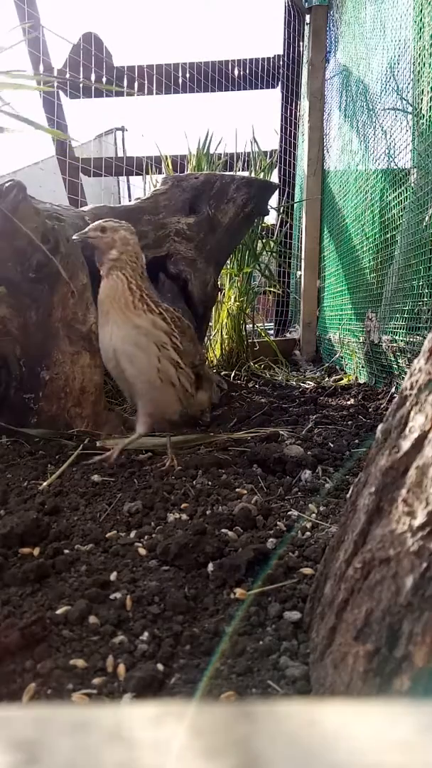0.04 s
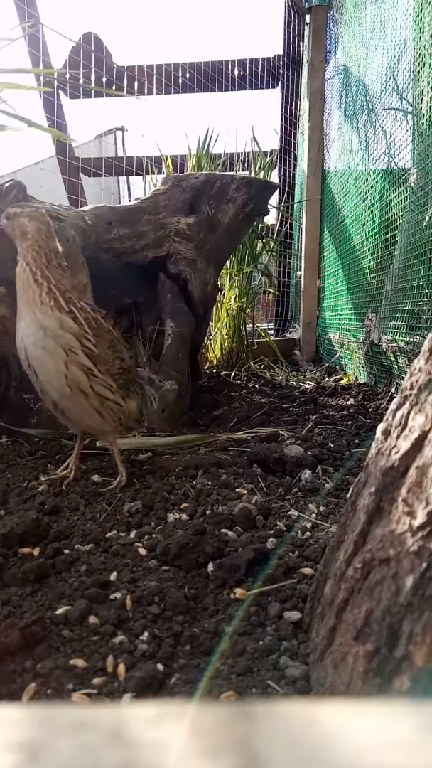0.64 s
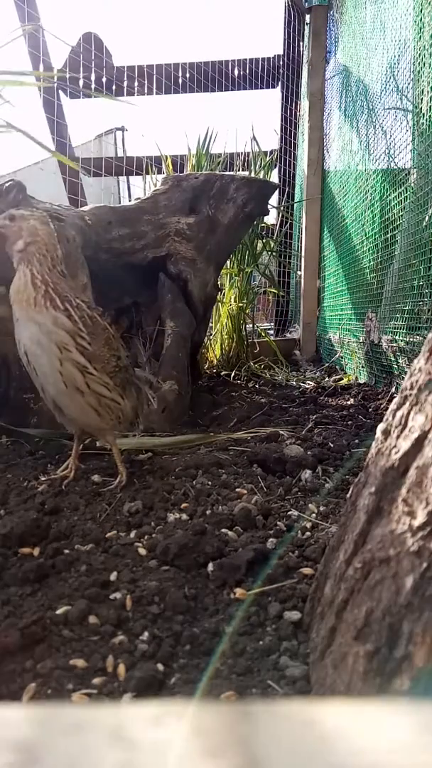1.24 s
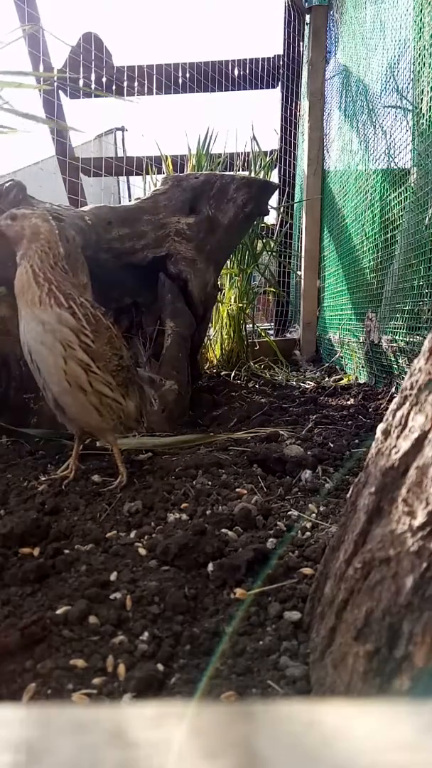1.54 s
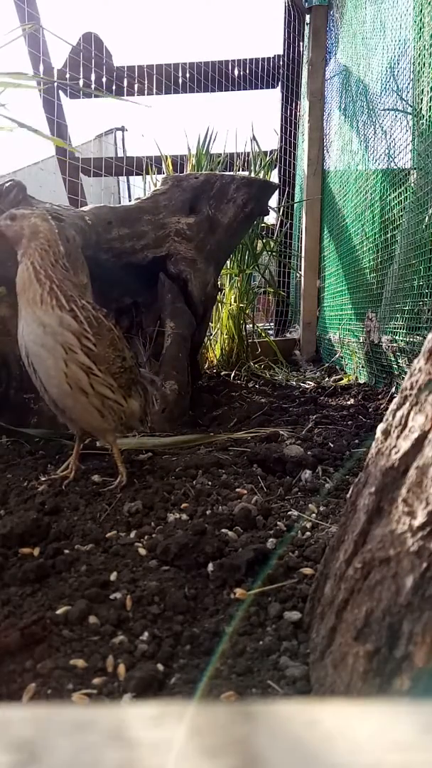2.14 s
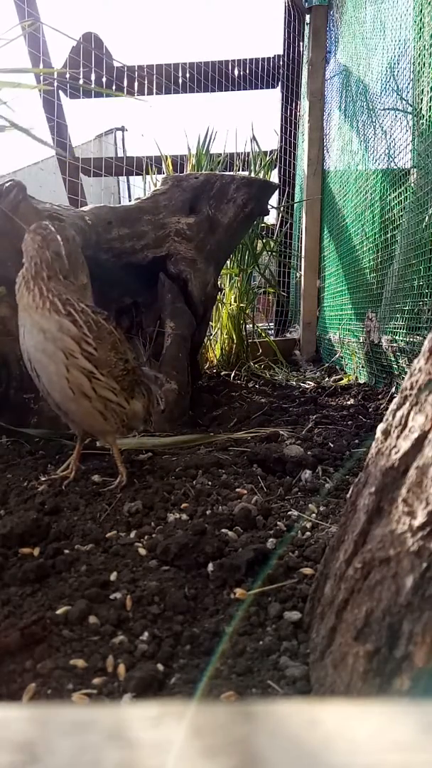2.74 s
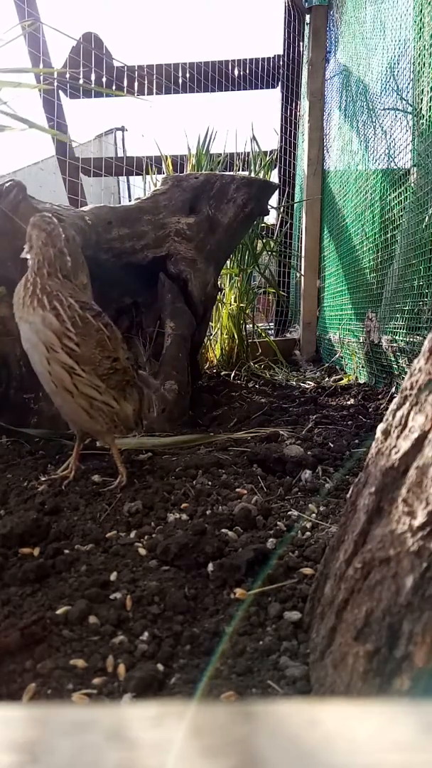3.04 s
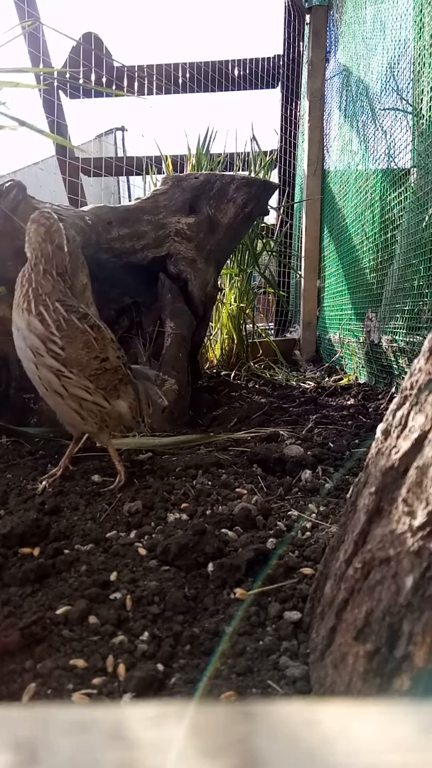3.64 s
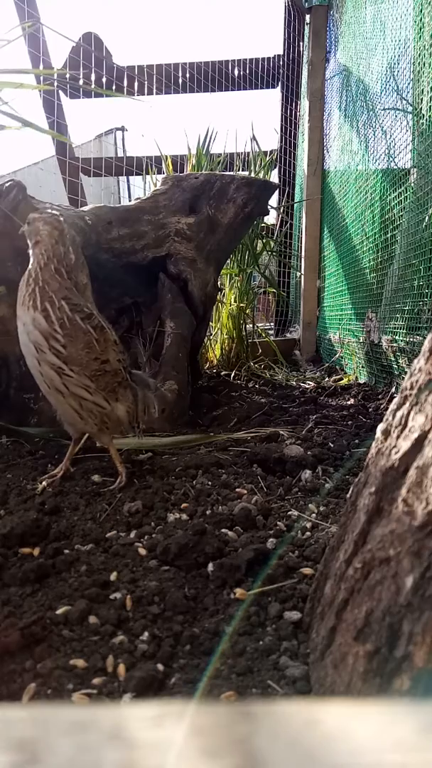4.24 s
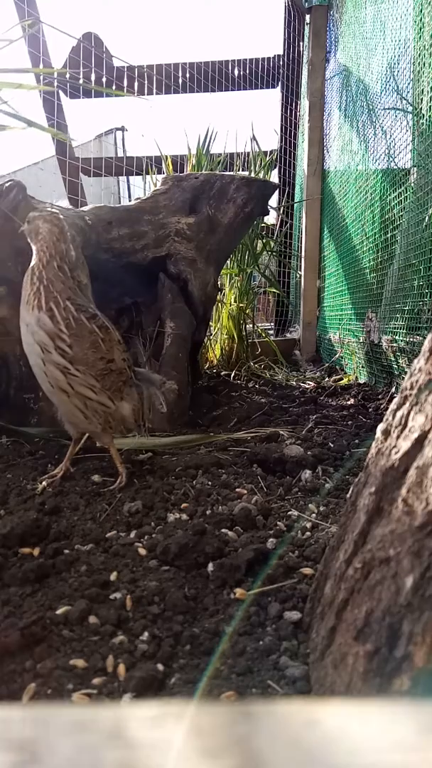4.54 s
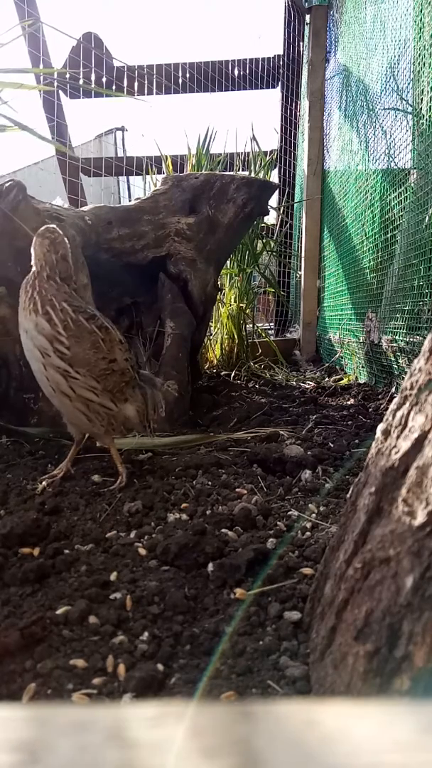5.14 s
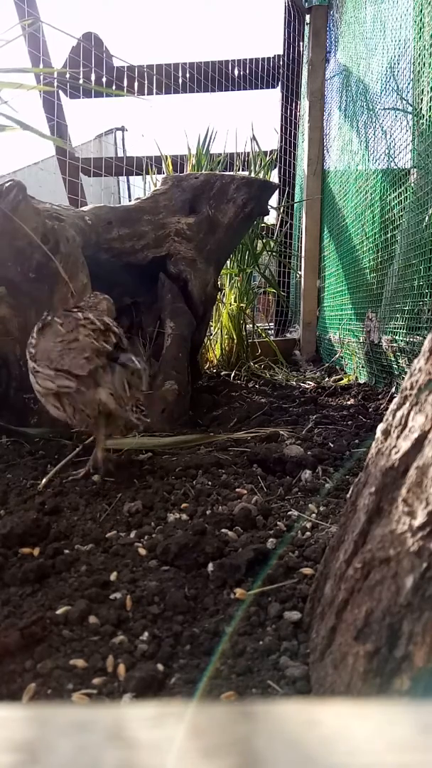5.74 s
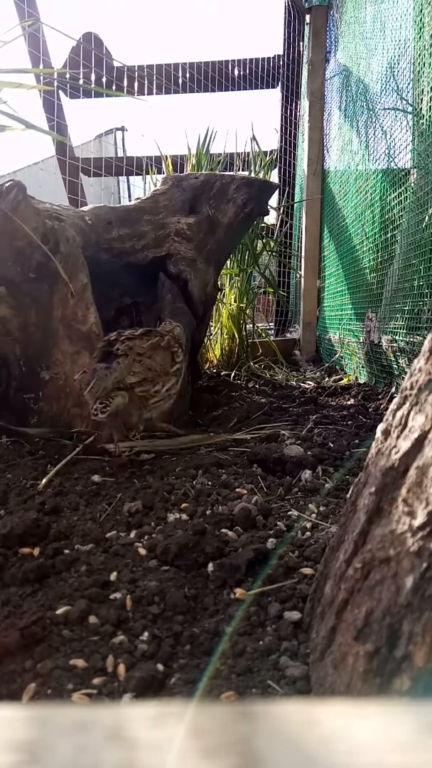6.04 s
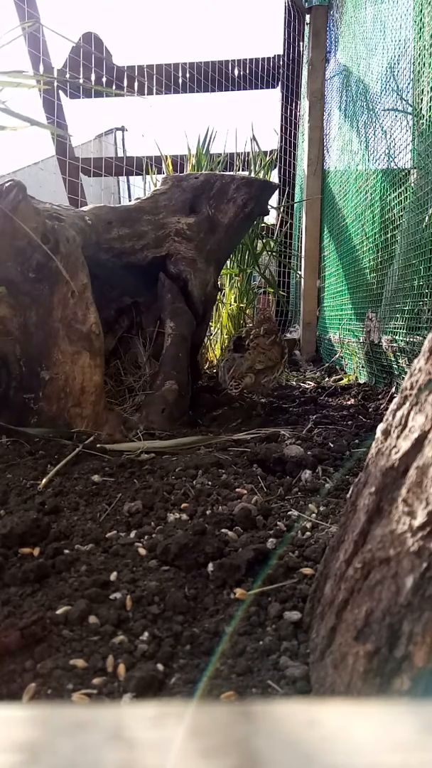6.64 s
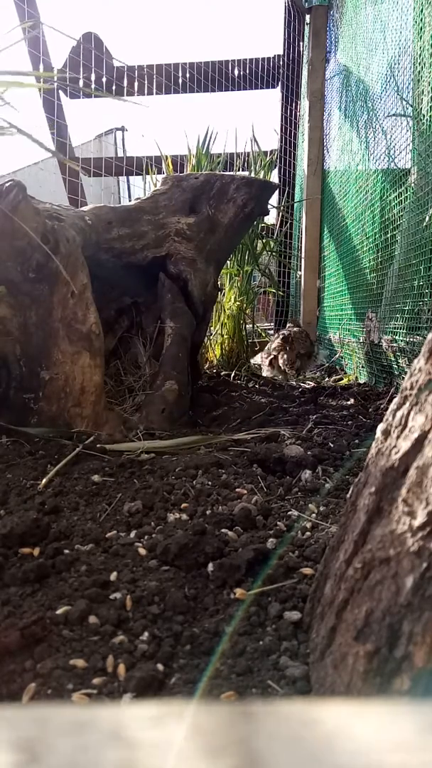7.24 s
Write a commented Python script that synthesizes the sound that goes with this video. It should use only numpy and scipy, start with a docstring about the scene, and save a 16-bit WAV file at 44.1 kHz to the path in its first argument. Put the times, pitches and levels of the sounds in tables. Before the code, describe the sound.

In an outdoor pen with a slight echo, a nearby quail crows three times, each a hoarse, brief wa-wa, and follows with a single hard chip. After that only faint distant bird calls and a couple of thin whistles are heard over a soft hush. Dry straw and soil rustle lightly now and then, while an uneven breeze buffets the microphone, mostly on the right.

```python
"""Quail crowing in a pen

A close quail gives three rasping crows and one sharp chip. In each crow, pulses from its voice box
ring in its throat and beak, and the outdoor pen adds a short echo. Small birds whistle nearby, others
call far off, and something rustles in the dry litter. A breeze buffets the right microphone over a
faint outdoor hush."""
import sys
import numpy as np
from scipy import signal
from scipy.fft import rfft, irfft, next_fast_len
from scipy.io import wavfile
from scipy.ndimage import uniform_filter1d

SR = 44100
rng = np.random.default_rng(int(sys.argv[2]) if len(sys.argv) > 2 else 0)


def store_pcm(level_fs):
    """Save levels as 16-bit WAV."""
    pcm = np.round(np.clip(level_fs, -1, 1) * 32767).astype(np.int16)
    wavfile.write(sys.argv[1], SR, np.atleast_2d(pcm).T)


N = 321923
TIME = np.arange(N) / SR


def from_db(db):
    return 10 ** (np.asarray(db) / 20)


def rms_one(x):
    """Scale a signal to an average power of 1."""
    return x / np.sqrt(np.mean(x ** 2) + 1e-20)


def in_time(rows):
    """Join rows of (time_s, values...) with straight lines: one curve per value."""
    times, *columns = np.transpose(rows)
    return [np.interp(TIME, times, column) for column in columns]


def hump(t, at, width, order=2):
    """A bell shape of height 1; a higher order flattens its top."""
    return np.exp(-np.minimum(np.abs((t - at) / width) ** order, 60))


def drift(rate_hz):
    """A smooth random wander, about 1 in size."""
    pole = np.exp(-40 * np.pi * rate_hz / SR)
    steps = rng.standard_normal(N // 20 + 2002)   # one per 20 samples
    slow = signal.lfilter([1], [1, -2 * pole, pole * pole], steps)[2000:]
    return np.interp(np.arange(N) / 20, np.arange(len(slow)), rms_one(slow))


def band(x, low_hz, high_hz):
    """Keep the sound between two frequencies."""
    edges = [low_hz, min(high_hz, SR / 2 - 500)]
    return signal.sosfilt(signal.butter(2, edges, "band", fs=SR, output="sos"), x + 1e-18)


def place(x, pan_db, lag_ms):
    """Make stereo: the left side is pan_db louder and lag_ms later than the right."""
    left = np.interp(TIME - lag_ms / 1000, TIME, x)
    return np.array([left * from_db(pan_db / 2), x * from_db(-pan_db / 2)])


def noise(colour, pan_db):
    """Separate left and right noise, shaped by rows of (frequency_hz, level_db)."""
    hz, db = np.transpose(colour)
    size = next_fast_len(N)
    bin_hz = np.arange(size // 2 + 1) * SR / size
    gain = from_db(np.interp(np.log(bin_hz + 1), np.log(hz), db, left=-90, right=-90))
    shaped = irfft(rfft(rng.standard_normal((2, size))) * gain, size)[:, :N]
    return rms_one(shaped) * from_db([[pan_db / 2], [-pan_db / 2]])


def note(rows, harmonics, waver, waver_hz):
    """A gliding tone with overtones; its pitch wanders by the fraction `waver`."""
    hz, db = in_time(rows)
    sounding = (TIME > rows[0][0]) & (TIME < rows[-1][0])
    level = uniform_filter1d(1. * sounding, size=130) * from_db(db)
    on, out = level > 1e-7, np.zeros(N)
    pitch_hz = hz * (1 + waver * drift(waver_hz))
    phase = 2 * np.pi * np.cumsum(pitch_hz[on]) / SR
    tone = sum(from_db(gain_db) * np.sin(round(k) * phase) for k, gain_db in harmonics)
    out[on] = level[on] * np.sqrt(2) * tone
    return out


def pen_echo(x, fade_s, dull_hz=4950):
    """Dense, dull reflections from logs, fence and walls, falling 60 dB in fade_s."""
    t = TIME[:SR]
    tail = rng.standard_normal((2, SR)) * from_db(-60 * t / fade_s) * (1 - np.exp(-t / 0.0031))
    tail = band(tail, 250, dull_hz)
    tail /= np.sqrt(np.sum(tail ** 2) / 2 * SR / 2 / dull_hz)
    return signal.fftconvolve(x[None], tail, axes=1)[:, :N]


def hush():
    """Faint outdoor noise, stronger on the left; its upper part swells slowly and drops away."""
    # loudness of each part over time: time_s, level_db
    low_levels = [(0, -60), (1, -63), (2.95, -64), (3.5, -61), (4.62, -57.5), (4.76, -63), (5.25, -60.5),
                  (5.4, -55), (6.2, -58.5), (7.3, -62)]
    upper_levels = [(0, -71), (.7, -62.5), (1, -68), (2.95, -69.5), (3.5, -63), (4.66, -55), (4.73, -67.5),
                    (7.3, -63)]
    # tone colour of each part: frequency_hz, level_db
    low_colour = [(200, -7.5), (330, 2), (520, 1), (750, -2.5), (1000, 0.5), (1300, -16.5), (2000, -29)]
    upper_colour = [(800, -18.5), (1150, 1), (1650, -4.5), (2100, -16.5), (3000, -23.5), (4500, -16),
                    (8000, -48)]
    low_db, = in_time(low_levels)
    upper_db, = in_time(upper_levels)
    low = from_db(low_db + 4.5 + 1.3 * drift(8.6)) * noise(low_colour, pan_db=8.5)
    return low + from_db(upper_db) * noise(upper_colour, pan_db=12)


def rustle_level(rise_s=0.016, fall_s=0.044, floor_db=-73.5):
    """Loudness in dB: each bout of rustling comes up quickly, holds and dies away."""
    # bouts of rustling: start_s, length_s, level_db
    bouts = [(.01, .44, -61.5), (.59, .2, -65), (2.04, 0.3, -62), (2.43, 0.21, -59.5), (3.42, 0.22, -60.5),
             (3.74, .12, -58), (3.87, .07, -63.5), (4.53, .08, -67.5), (4.675, 0.055, -65.5),
             (4.85, 0.32, -61.5), (5.31, 0.14, -59), (5.59, 0.098, -68.5), (5.94, 0.016, -69),
             (6.11, 0.088, -68.5), (7.11, 0.047, -70.5)]
    power = from_db(floor_db) ** 2
    for start, length, db in bouts:
        fade = np.maximum(start - TIME, 0) / rise_s + np.maximum(TIME - start - length, 0) / fall_s
        power = power + from_db(db) ** 2 * np.exp(-2 * np.minimum(fade, 20))
    return 10 * np.log10(power)


def straw_grain(flutter_db=1.5, ticks_per_s=38, decay_s=0.0069):
    """The uneven grain of a rustle: a fine flutter, and ticks as single straws snap."""
    snaps = (rng.random(N) < ticks_per_s / SR) * np.minimum(rng.exponential(1, N), 3)
    ticks = signal.lfilter([1], [1, -np.exp(-1 / (decay_s * SR))], snaps + 1e-18)
    return rms_one(from_db(flutter_db * drift(90)) + 0.87 * ticks)


def rustle():
    """Dry litter rustles; a fine hiss and a low rumble swell with it."""
    # tone colour of each layer: frequency_hz, level_db
    straw_colour = [(1200, -7), (2500, -5), (4500, -5), (6600, 1.5), (7500, -6.5), (8600, -18.5),
                    (12000, -32)]
    hiss_colour = [(6000, -24), (8500, -13.5), (11500, -11.5), (13500, -13), (15000, 4.5), (17000, -1)]
    rumble_colour = [(20, -19.5), (55, -2), (110, 3), (170, -4.5), (270, -9.5), (450, -24), (800, -37.5)]
    level_db, grain = rustle_level(), straw_grain()
    straw = from_db(level_db + 5.5) * grain * noise(straw_colour, pan_db=0.5)
    hiss = from_db(0.81 * level_db - 10.5) * grain * noise(hiss_colour, pan_db=0.5)
    rumble = from_db(-45 + 0.45 * (level_db - level_db.mean())) * noise(rumble_colour, pan_db=1.5)
    return straw + hiss + rumble


def crackles(decay_s=0.025, gain_db=-8):
    """Dry straw and soil crunch in short grainy bursts."""
    # crunches: start_s, level_db
    bursts = [(0.7417, -37.5), (2.444, -38.5), (2.5546, -41), (2.614, -57), (2.672, -45.5), (3.747, -40),
              (4.134, -43), (4.174, -38), (4.8668, -45.5), (6.1883, -46.5)]
    level = np.zeros(N)
    for start, db in bursts:
        first = int(start * SR)
        level[first:] += from_db(db + gain_db) * np.exp(-TIME[:N - first] / decay_s)
    grain = from_db(3.5 * drift(300))
    colour = [(1500, -2.5), (4000, -3), (6700, 5.5), (8500, -8), (16000, -11.5)]
    return uniform_filter1d(level, size=70) * grain * noise(colour, pan_db=-1)


def wind(lumpy_db=3.5, rise_share=0.7):
    """Gusts buffet the right microphone; single swirls of air push and then pull its membrane."""
    # gusts: peak_s, level_db, decay_s
    gusts = [(0.06, -25, 0.11), (0.181, -27, 0.035), (0.65, -37, 0.039), (0.77, -33.5, 0.028),
             (0.984, -22, 0.1), (1.095, -18.5, 0.053), (1.278, -20.5, 0.014), (1.349, -24, 0.026),
             (1.491, -16, 0.04), (1.614, -26, 0.051), (1.757, -26, 0.02), (1.867, -28, 0.035),
             (2.099, -22.5, 0.047), (2.481, -33, 0.067), (2.867, -24.5, 0.047), (3.001, -27, 0.08),
             (3.245, -19.0, 0.038), (3.374, -23.5, 0.057), (3.606, -27, 0.075), (3.89, -22, 0.051),
             (3.966, -15, 0.022), (4.063, -23, 0.078), (4.162, -17.5, 0.011), (4.273, -29.5, 0.051),
             (6.343, -27.5, 0.032), (6.481, -29.0, 0.078), (6.66, -19, 0.037), (6.769, -19.5, 0.0078),
             (6.872, -32.5, 0.16), (7.17, -17.5, 0.066), (7.249, -23, 0.016)]
    # tone colour of the gusts: frequency_hz, level_db
    colour = [(20, -33.5), (40, -10.5), (65, 0.5), (100, 1), (140, -2.5), (200, -12), (300, -22.5),
              (500, -34), (900, -52.5)]
    # swirls that slap the microphone: time_s, level_db, half_length_ms
    slaps = [(.065, -16, 1.6), (.989, -12, 1.15), (1.056, -14.5, 1.55), (1.102, -15, 0.76),
             (1.471, -13.5, 0.93), (1.511, -11, 1.08), (2.086, -9.5, 1.52), (4.057, -11.5, 1.84),
             (6.671, -12.5, 2.25), (7.157, -8.5, 1.5), (7.178, -9, 1.44), (7.251, -17, 1.23)]
    power = 0
    for at, db, decay in gusts:
        fade = np.maximum(TIME - at, (at - TIME) / rise_share) / decay   # builds faster than it dies
        power = power + from_db(db) ** 2 * np.exp(-2 * np.minimum(fade, 20))
    out = noise(colour, pan_db=-9.5) * np.sqrt(power) * from_db(lumpy_db * drift(25))
    out *= from_db([[-25], [-5]])   # left, right
    for at, db, half_ms in slaps:
        offset = (TIME - at) * 1000 / half_ms
        out[1] -= from_db(db) * 2 * offset / (1 + offset ** 2 / 4) ** 4
    return out


def far_birds(fade_db=20, wander_hz=44.42):
    """Short, hoarse gliding calls that swell and fade, with plenty of echo."""
    # distant calls: middle_s, half_length_s, pitch_hz, glide_hz_per_s, level_db
    far_calls = [(.535, 0.046, 1412, 1998, -56.5), (1.129, 0.037, 602, 398, -45),
                 (1.629, 0.059, 3640, -1000, -69), (1.732, 0.12, 3500, -300, -79),
                 (1.892, 0.043, 4170, 1193, -65), (1.957, 0.029, 1090, -900, -44.5),
                 (5.591, .08, 889, 197, -44), (5.852, 0.13, 471.6, -400, -49),
                 (6.093, 0.045, 859, 703, -44.5), (6.763, .12, 891, 8, -50.5)]
    calls = 0
    for at, half, hz, glide, db in far_calls:
        rows = [(at + k * half, hz + glide * k * half, db - fade_db * k * k)
                for k in np.linspace(-1, 1, 7)]
        calls = calls + note(rows, [(1, 1.5), (2, -24)], waver=wander_hz / hz, waver_hz=76)
    echoing = from_db(-3.5) * calls + from_db(-4) * pen_echo(calls, fade_s=0.18)
    return echoing * from_db([[3], [-4]])   # left, right


def near_birds():
    """Small birds give thin, scratchy whistles."""
    # whistles: waver_fraction, then rows of time_s, pitch_hz, level_db
    whistles = [(0.021, [(2.226, 5300, -45), (2.234, 4980, -44.5), (2.268, 3920, -44.5), (2.3, 3640, -45),
                (2.335, 3570, -47.5), (2.37, 3470, -68)]), (0.014, [(4.979, 5680, -44),
                (4.988, 5190, -45.5), (5.018, 4660, -33.5), (5.04, 4220, -54), (5.075, 3990, -40),
                (5.1, 3520, -82)]), (0.062, [(7.07, 2930, -60), (7.09, 3110, -52.5), (7.105, 3920, -60),
                (7.132, 4400, -53.5), (7.14, 3010, -50.5), (7.15, 2530, -73)])]
    song = sum(note(rows, [(1, 1.5), (2, -19.5)], waver, waver_hz=340) for waver, rows in whistles)
    return place(song, pan_db=-0.5, lag_ms=0.04) + from_db(-2) * pen_echo(song, fade_s=0.14)


def quail_chip(rasp_db=-30, rasp_at_s=4.214, rasp_width_s=0.0061):
    """A fast upward swoop breaks into a hard note and ends in a rasp; the pen rings on."""
    # the two notes: time_s, pitch_hz, level_db
    swoop = [(4.178, 765, -54.5), (4.185, 1020, -31.5), (4.191, 1345, -36), (4.195, 1744, -21),
             (4.199, 1726, -12), (4.202, 1830, -21.5), (4.206, 1790, -44.5)]
    hard_note = [(4.197, 1460, -47.5), (4.2, 1446, -22.5), (4.204, 1486, -19), (4.2083, 1590, -6.5),
                 (4.211, 1560, -17), (4.213, 1400, -14.5), (4.215, 1290, -28), (4.222, 1094, -47.5)]
    # harmonics of the hard note, the second loudest: pitch_multiple, level_db
    harmonics = [(1, -21.5), (2, -0.5), (3, -30.5), (4, -29.5), (5, -45.5)]
    tone = note(swoop, [(1, -1.5), (2, -27.5)], waver=0.008, waver_hz=200)
    tone += note(hard_note, harmonics, waver=0.011, waver_hz=410)
    colour = [(600, -15), (1200, 6.5), (2200, -4), (4300, 4), (6600, -7.5), (7800, -32), (12000, -35)]
    burst = np.exp(-((TIME - rasp_at_s) / rasp_width_s) ** 2 / 2)
    rasp = from_db(rasp_db) * noise(colour, pan_db=3.5) * burst
    echo = from_db(-15) * pen_echo(tone, fade_s=0.25) + from_db(3) * pen_echo(rasp[0], fade_s=0.18)
    return place(tone, pan_db=0.5, lag_ms=0.029) + rasp + echo


def crow_movements(release_s=0.034, shut_db=-9.5):
    """How throat and beak move: every crow follows the same pattern."""
    # crows: start_s, length_s, rasp_hz, throat_db, beak_db, attack_s, scoop_s, sag_fraction
    crows = [(0.063, 0.36, 88.8, -30.5, 0, 0.031, 0.043, .025),
             (1.152, .375, 94.7, -29.5, 1.5, 0.026, .037, 0.032),
             (3.02, 0.3596, 98.07, -29, 1, 0.022, .034, 0.074)]
    # the beak opens twice per crow, "wa-wa": middle_s, half_length_s, rise_db
    openings = [(0.109, 0.074, 20.5), (0.291, 0.049, 21.5)]
    controls = np.zeros((5, N))
    controls[0] = crows[0][2]   # keeps the rasp rate above zero between crows
    for start, length, rate_hz, level_db, beak_gain_db, attack_s, scoop_s, sag in crows:
        on = (TIME > start) & (TIME < start + length)
        t = TIME[on] - start
        remaining = length - t
        onset = hump(t, 0, scoop_s)   # starts accented and low, then slides up
        push = hump(t, 0.2142, 0.0383)   # a mid-call push swells the throat and bends the pitch down
        lift = hump(t, 0.243, 0.028)   # then the pitch lifts, and finally sags
        sagging = (1 + np.tanh((t - 0.295) / 0.013)) / 2
        rasp_hz = rate_hz * (1 - 0.18 * onset - 0.01182 * push + 0.065 * lift - sag * sagging)
        fade_in_db = 24 * np.maximum(1 - t / attack_s, 0)
        fade_out_db = 14.5 * np.maximum(1 - remaining / release_s, 0)
        throat_db = level_db + 5.5 * onset + 7 * push - fade_in_db - fade_out_db
        open_db = sum(rise_db * hump(t, at, half, order=4) for at, half, rise_db in openings)
        beak_db = beak_gain_db + shut_db + open_db
        rough = 0.28 + 0.2 * onset + 0.8 * hump(remaining, 0, 0.05)   # hoarse at both ends
        controls[:, on] = rasp_hz, throat_db, beak_db, rough, np.ones_like(t)
    return controls


def voice_box(rasp_hz, rough, jitter=0.0304, accent_db=4):
    """Membranes beat five times per rasp cycle; in each cycle the beats bunch twice and swell once."""
    cycle = 2 * np.pi * np.cumsum(rasp_hz * (1 + jitter * rough * drift(70))) / SR
    bunching = 0.18 * np.sin(cycle + 0.47) + 0.27 * np.sin(2 * cycle + 1.74)
    beats = (5 * cycle + bunching + 0.76 * rough * drift(180)) / (2 * np.pi)
    samples_from_beat = (beats % 1 - 0.5) / (5 * rasp_hz) * SR
    pulses = np.sinc(samples_from_beat) * np.exp(-(samples_from_beat / 6) ** 2)
    strength = from_db(accent_db * np.cos(cycle + 0.89) + 3.5 * rough * drift(120))
    breath = (0.06 + rough) * rng.standard_normal(N)
    return strength * (rms_one(pulses) + breath)


def quail_crows():
    """Pulses ring in throat and beak; opening the beak brings up the ringing near 2 kHz."""
    # ringing bands of the voice: centre_hz, width_hz, level_db, beak_share, pan_db, lag_ms
    resonances = [(535, 137, -14.5, 0.08, 5, 0.43), (998, 225, 1, 0.01, 0, 0.19),
                  (1182, 135, -1.5, 0, 4, 0.32), (1766, 114, 1, 0.39, -0.5, 0.2),
                  (1914, 70, -1.5, 1, -0.5, 0.2406), (2133, 150, -2, 0.99, 1.5, 0.2504),
                  (2466, 240, -8.5, 0.95, 6, 0.28), (2688, 270, -9.5, 0.8, 2.5, 0.31),
                  (3064, 180, -23, 0, -3.5, 0.38), (3930, 180, -24.5, 0.5, 1, 0.32),
                  (4390, 370, -28, 0, 5, 0.297), (5150, 330, -27, 0.5, -4, 0.33),
                  (6540, 390, -34.5, 0, -3, .31), (7450, 190, -36, 0, -2, 0.31),
                  (12200, 8500, -40.5, 0.3, -1.5, 0.341)]
    rasp_hz, throat_db, beak_db, rough, sounding = crow_movements()
    source = voice_box(rasp_hz, rough ** 1.5)
    voice = 0
    for hz, width, db, beak_share, pan_db, lag_ms in resonances:
        ringing = band(source, hz - width / 2, hz + width / 2)
        ringing /= np.sqrt(uniform_filter1d(ringing ** 2, size=1400) + 1e-12)   # even out its loudness
        level = uniform_filter1d(sounding * from_db(throat_db + db + beak_share * beak_db), size=130)
        voice = voice + place(ringing * level, pan_db, lag_ms)
    return voice + from_db(-13) * pen_echo(voice[0], fade_s=0.2)


def scene():
    """All the sounds together, in stereo."""
    birds = quail_crows() + quail_chip() + near_birds() + far_birds()
    return birds + wind() + hush() + rustle() + crackles()


def record(dry, cutoff_hz=15800):
    """Cut off the highest treble steeply."""
    return signal.sosfilt(signal.ellip(10, 0.1, 80, cutoff_hz, fs=SR, output="sos"), dry)


dry = scene()
out = record(dry)
store_pcm(out)
```